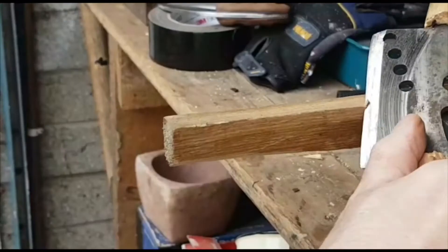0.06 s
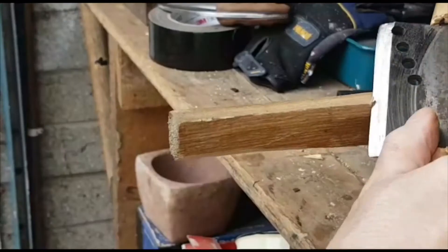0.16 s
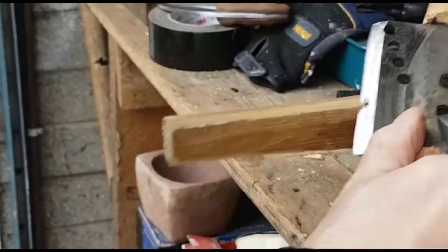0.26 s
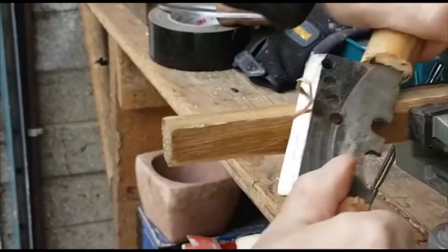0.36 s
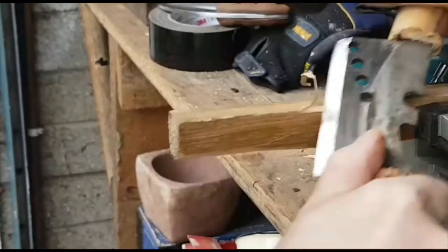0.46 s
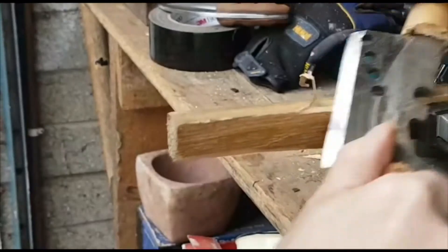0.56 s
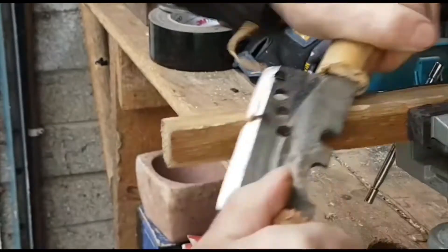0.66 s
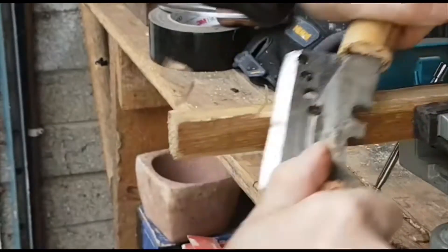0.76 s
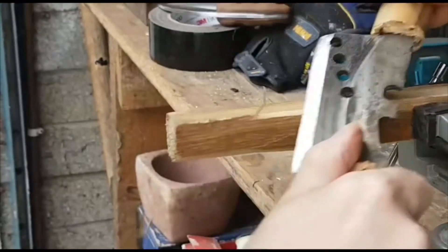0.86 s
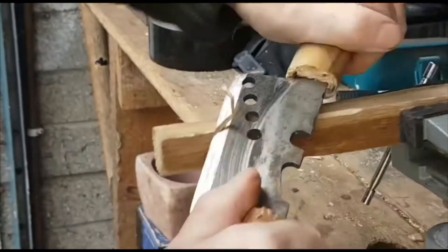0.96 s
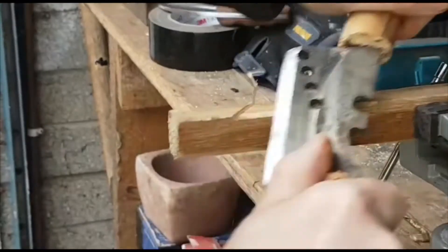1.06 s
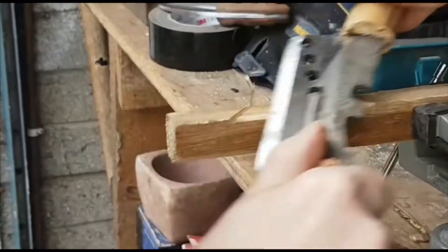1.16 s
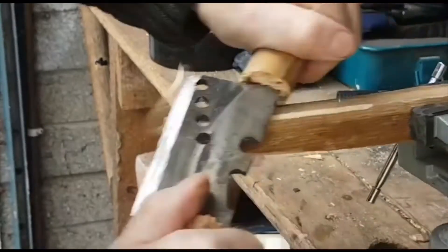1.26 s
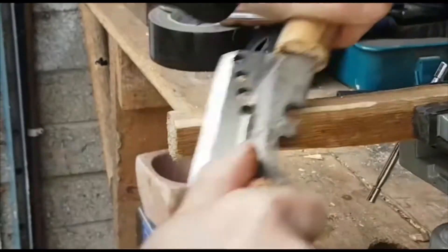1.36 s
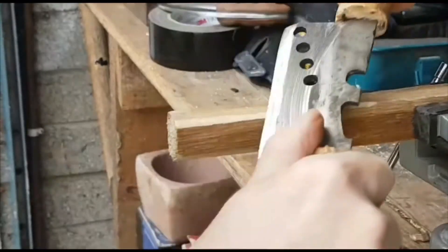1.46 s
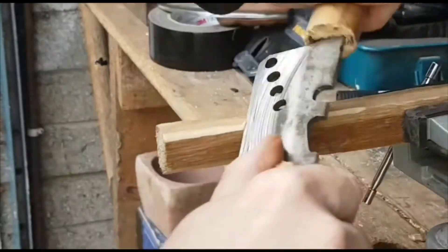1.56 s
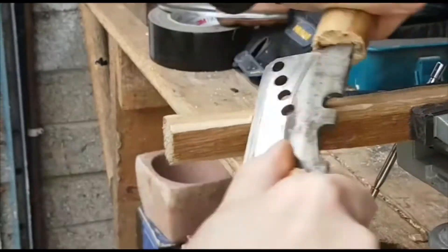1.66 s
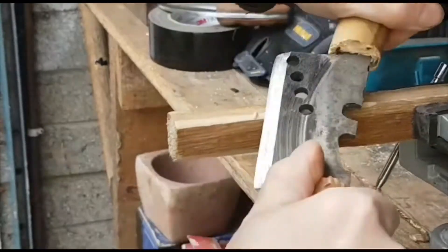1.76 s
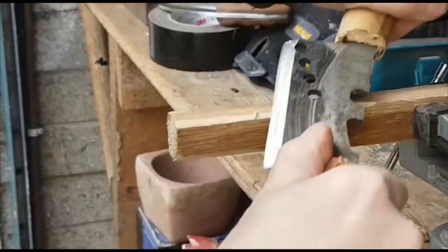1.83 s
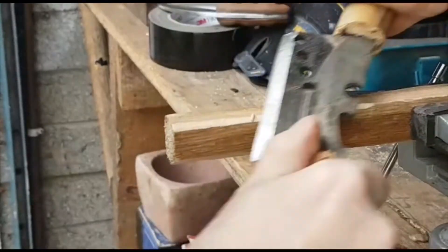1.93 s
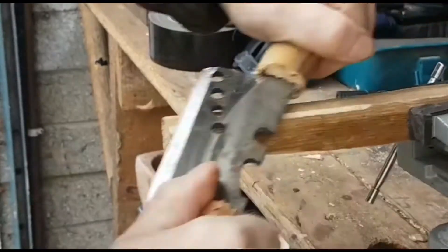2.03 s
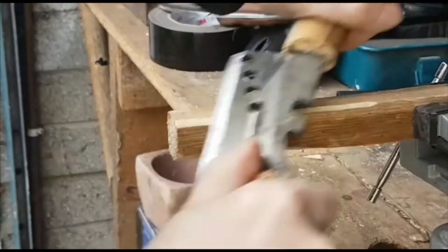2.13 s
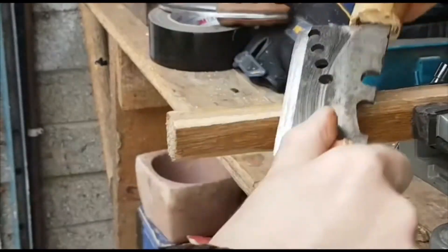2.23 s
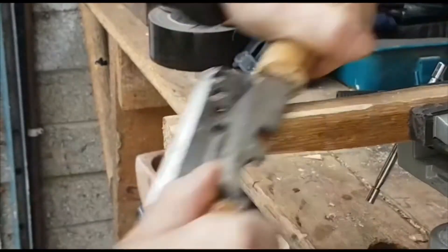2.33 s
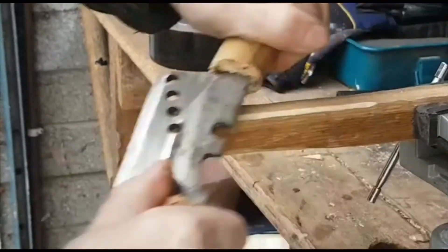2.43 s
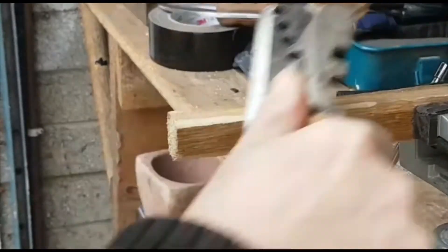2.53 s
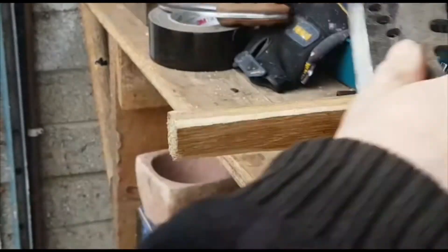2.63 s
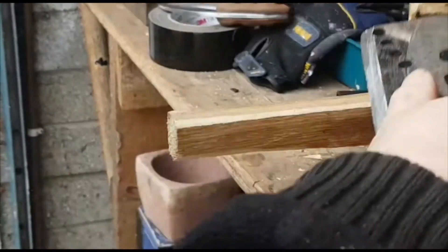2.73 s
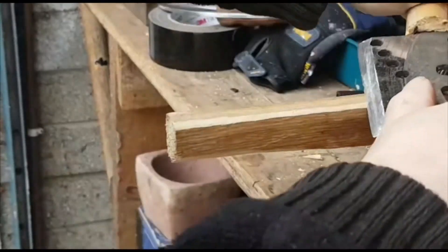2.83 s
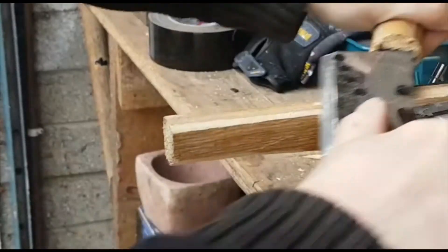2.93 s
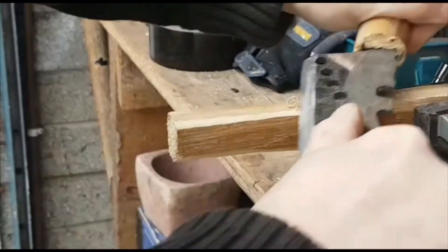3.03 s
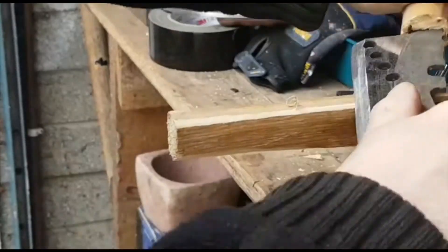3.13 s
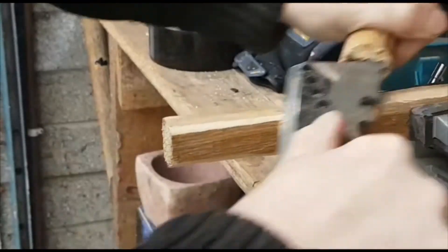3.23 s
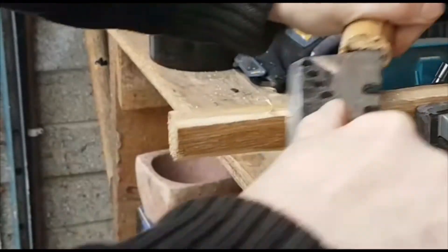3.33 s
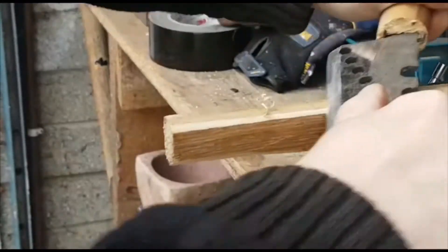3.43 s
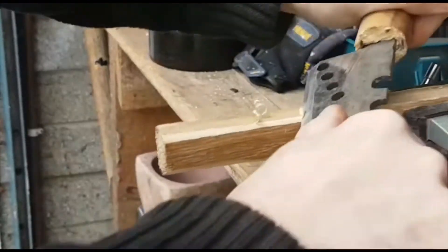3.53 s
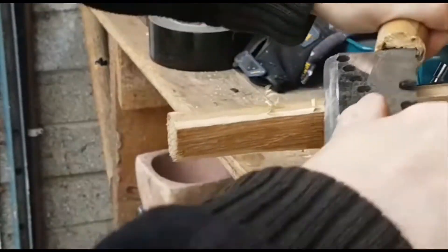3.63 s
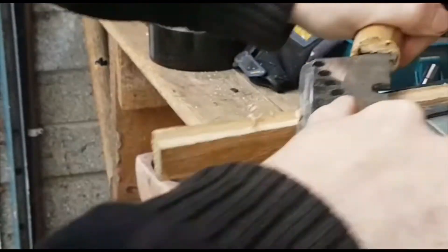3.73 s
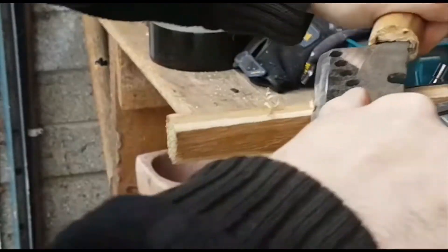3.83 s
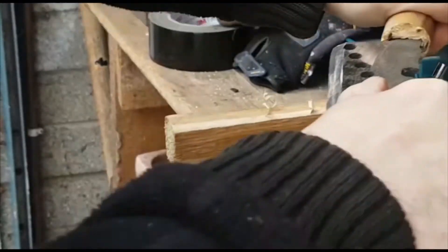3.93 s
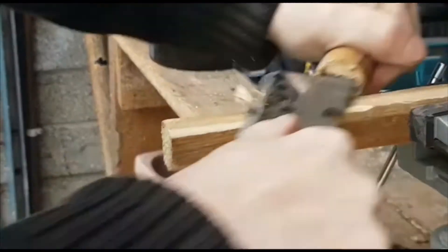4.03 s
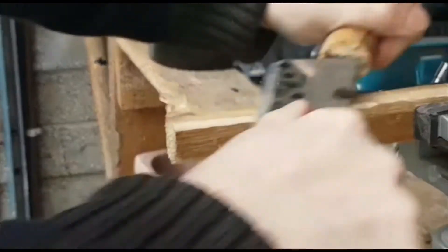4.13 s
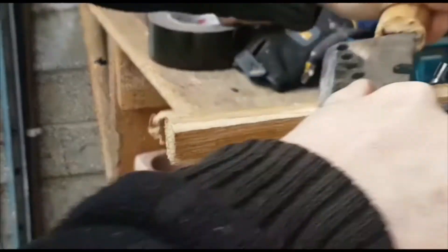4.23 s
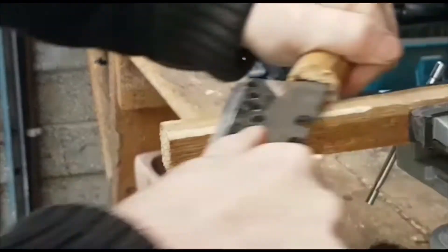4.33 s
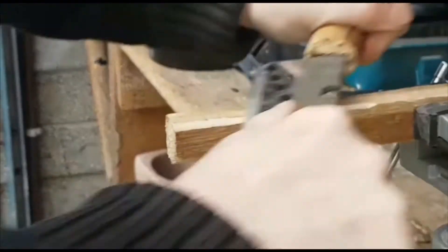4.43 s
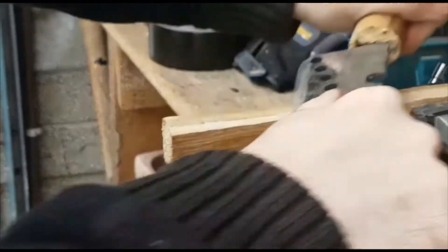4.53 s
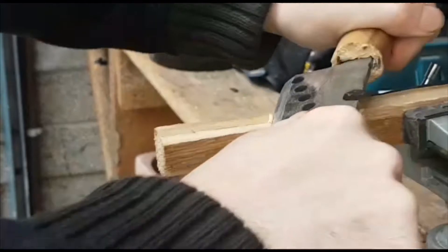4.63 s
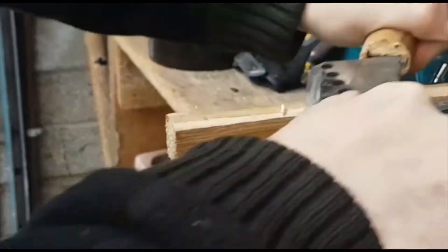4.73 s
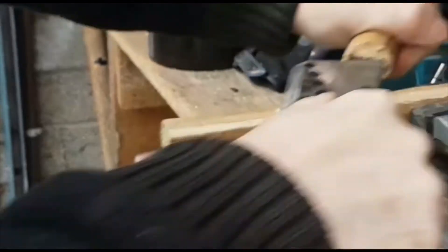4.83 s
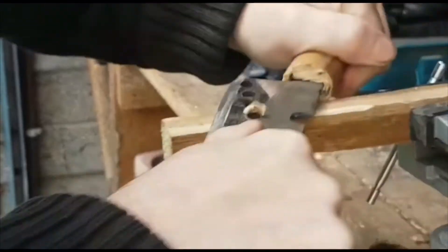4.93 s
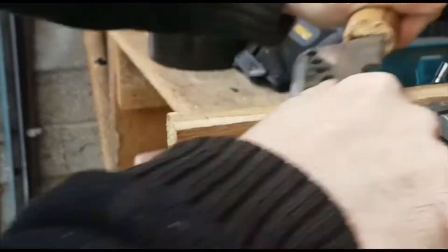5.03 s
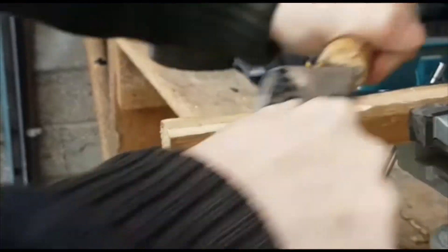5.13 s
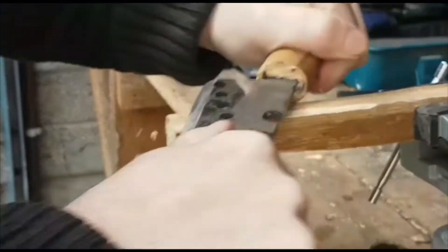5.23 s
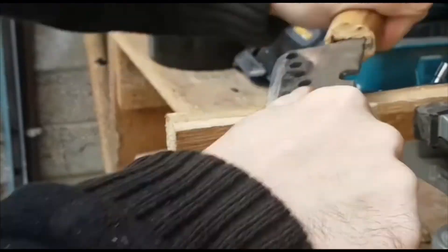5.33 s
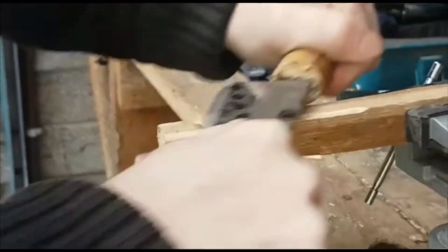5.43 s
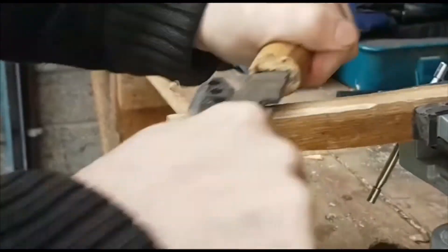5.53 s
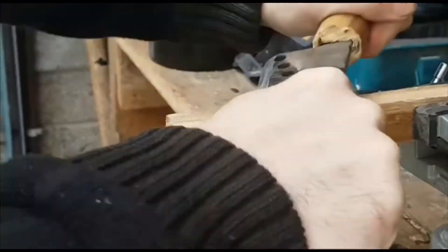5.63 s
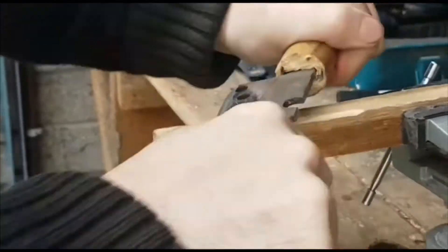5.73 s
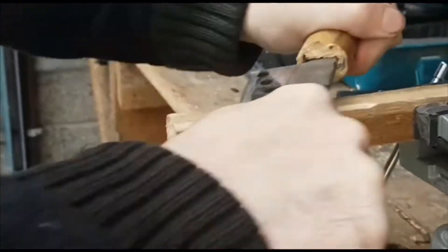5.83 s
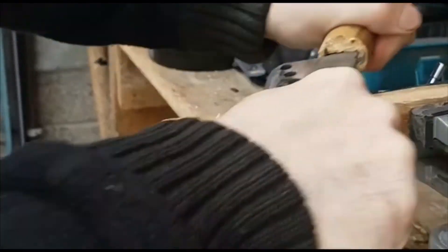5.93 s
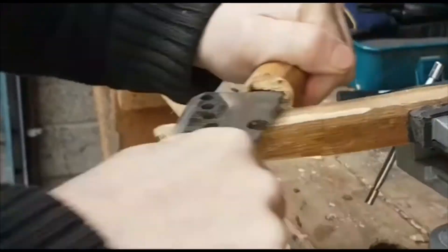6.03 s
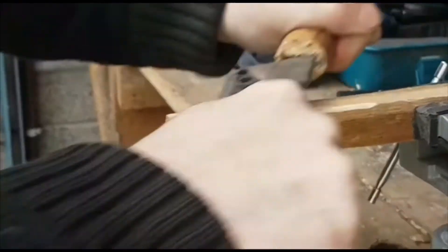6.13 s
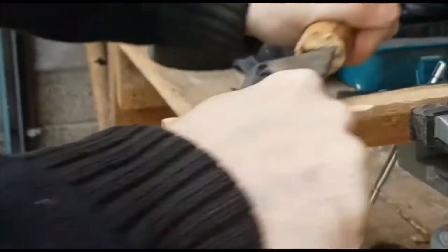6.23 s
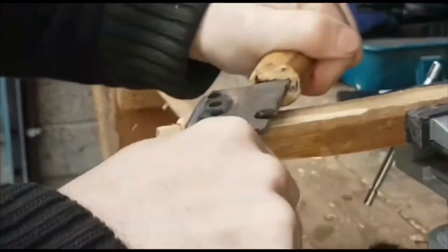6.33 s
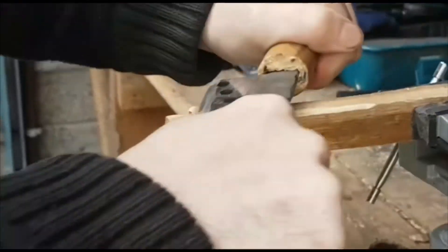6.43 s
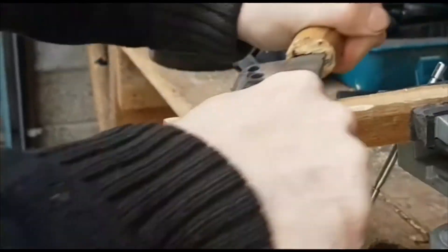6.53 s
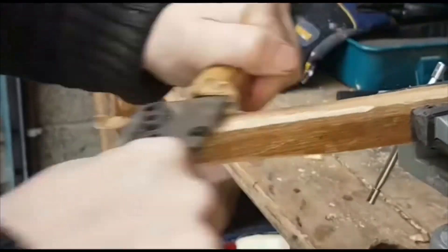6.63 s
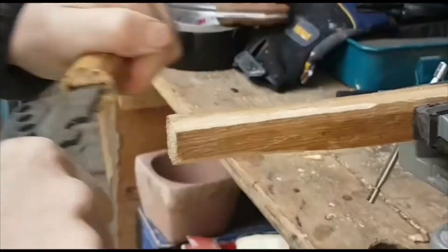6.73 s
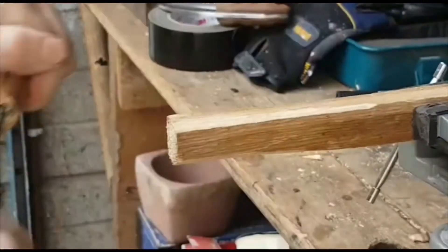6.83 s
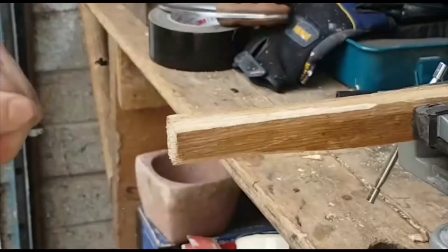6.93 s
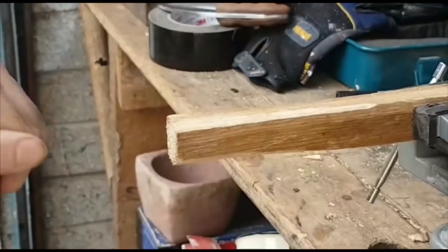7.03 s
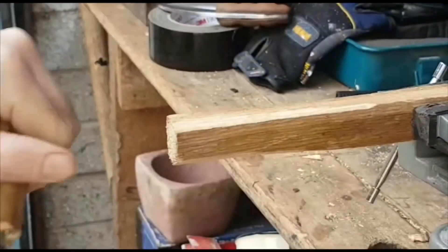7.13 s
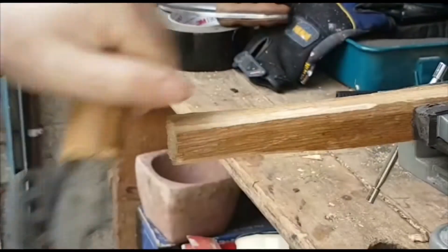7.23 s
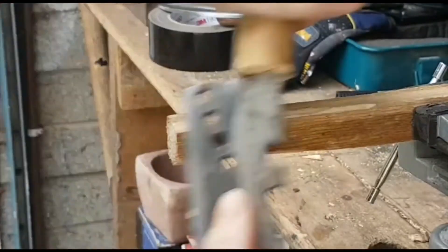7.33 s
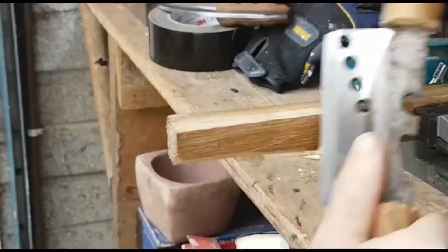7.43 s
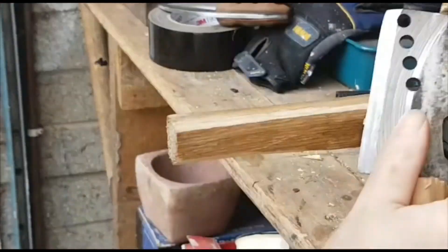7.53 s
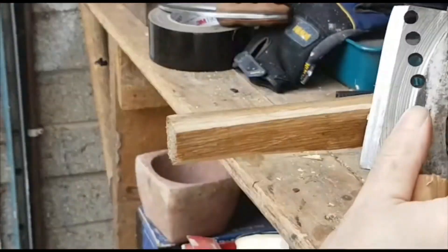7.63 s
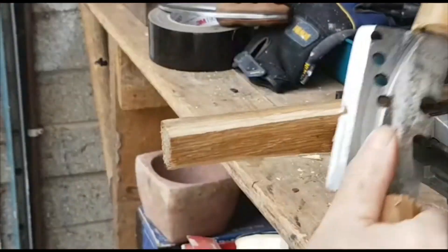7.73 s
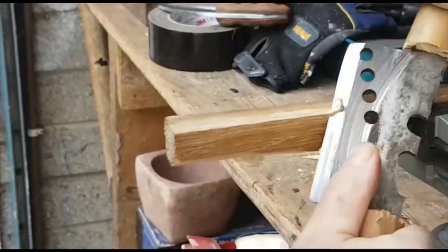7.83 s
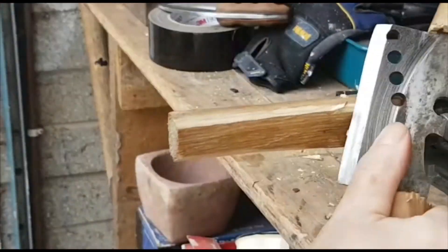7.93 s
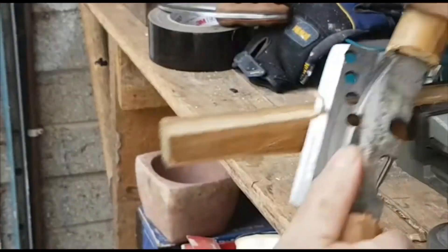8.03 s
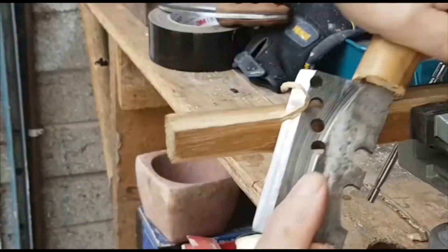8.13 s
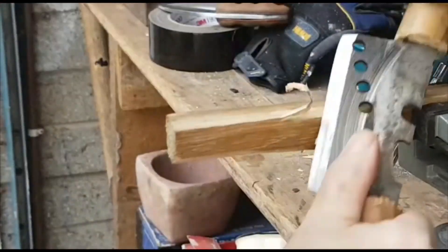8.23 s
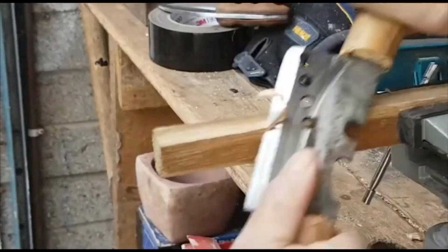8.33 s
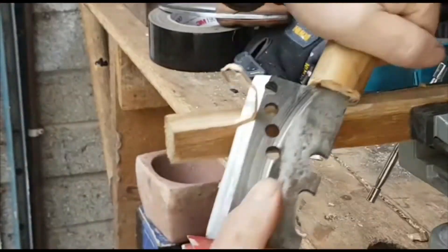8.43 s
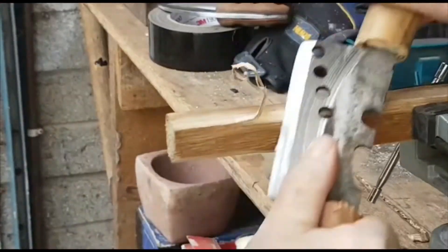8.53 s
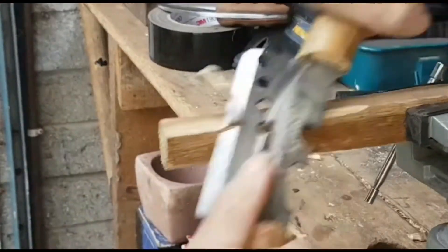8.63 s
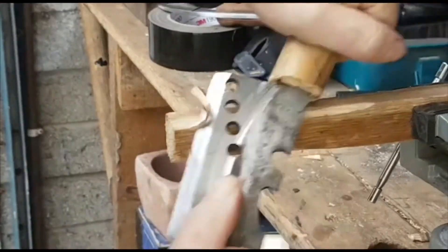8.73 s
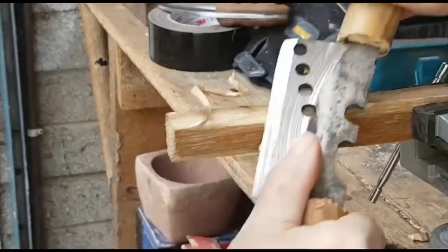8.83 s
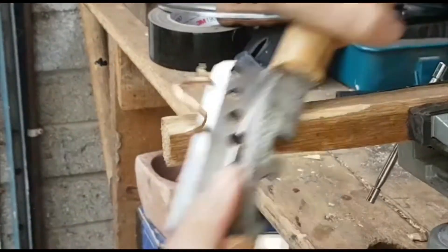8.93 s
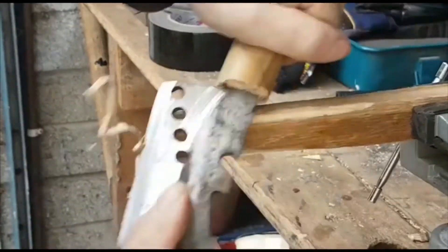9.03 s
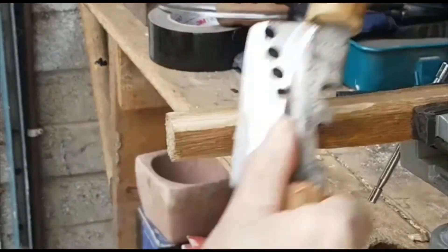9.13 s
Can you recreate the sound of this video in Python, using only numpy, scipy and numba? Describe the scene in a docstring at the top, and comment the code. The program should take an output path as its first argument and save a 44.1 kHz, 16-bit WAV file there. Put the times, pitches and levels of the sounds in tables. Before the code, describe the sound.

Quick, dry scrapes of a draw-knife cutting wood in a vise, close up, with splinters snapping and dull taps in a small workshop.

```python
"""Short, rasping cuts, close to the microphone: a steel draw-knife shaves a wooden stick held in a vise.
The edge sticks and slips, fibres tear and hiss, splinters crack, and deep cuts shake the stick.
Between cuts the blade skims the wood, taps down, chatters and once squeaks.
The place is a small, dry workshop, heard in stereo: quick reflections off the bench, faint room tone."""
import sys
import numpy as np
from scipy import signal
from scipy.fft import rfft, irfft
from scipy.io import wavfile
from numba import njit

SR = 44100
rng = np.random.default_rng(int(sys.argv[2]) if len(sys.argv) > 2 else 0)


def bounce(signal):
    """Save signal as a 16-bit WAV file at the path given by the first command-line argument."""
    frames = np.transpose(np.atleast_2d(signal))
    limited = np.clip(frames, -1, 1)
    pcm = np.round(limited * 32767).astype(np.int16)
    wavfile.write(sys.argv[1], SR, pcm)


N = 404397
TIME = np.arange(N) / SR
FFT_SIZE = 8192
FREQS = np.arange(FFT_SIZE // 2 + 1) * SR / FFT_SIZE

# the blade is pulled through the wood, then slid back; the return rub is very low where it lifts off:
# (start [s], cut length [s], force [dB], tearing [dB], return rub [dB])
KNIFE_STROKES = [(0.152, 0.076, -40, -48.5, -56), (0.477, 0.098, -39.5, -50.5, -59.5),
                 (0.787, 0.042, -46, -48, -53.5), (1.066, 0.073, -44, -44, -57),
                 (1.822, 0.1, -39.5, -56.5, -61), (2.142, 0.12, -48, -52.5, -110),
                 (2.766, 0.098, -50.5, -61, -54.5), (3.047, 0.1, -50, -57.5, -52),
                 (3.306, 0.09, -55, -80, -68.5), (3.582, 0.045, -42.5, -64, -52),
                 (3.831, 0.097, -42, -51.5, -48.5), (4.112, 0.14, -47, -55.5, -51.5),
                 (4.396, 0.088, -52, -58.5, -58.5), (4.7, 0.093, -43.5, -51, -53),
                 (4.968, 0.11, -48, -52, -52), (5.252, 0.099, -43, -50.5, -48.5),
                 (5.542, 0.099, -49.5, -58.5, -55.5), (5.845, 0.085, -42.5, -51, -53),
                 (6.101, .095, -42.5, -49, -59.5), (6.429, 0.12, -36.5, -43.5, -110),
                 (7.564, .11, -52.5, -77, -67), (7.885, 0.1, -42.5, -50, -59.5),
                 (8.196, 0.11, -41, -47.5, -58), (8.466, 0.12, -48, -51, -54.5),
                 (8.773, .11, -45, -48, -110), (9.148, 0.02, -42.5, -66, -110)]
# the edge catches and a splinter cracks off: (time [s], strength [dB], bright snap [dB])
SPLINTERS = [(0.136, -53, -60.5), (0.51, -19, -53), (0.867, -30.5, -70), (0.883, -30, -68),
             (1.069, -32, -47.5), (1.814, -29.5, -50), (1.849, -20.5, -76), (2.152, -31.5, -64),
             (3.582, -29, -55), (3.833, -29, -53.5), (4.109, -36.5, -80), (4.702, -26, -52),
             (4.969, -32.5, -78), (5.243, -33.5, -82), (5.846, -29, -53.5), (6.472, -30, -49),
             (7.938, -69, -52), (7.979, -33.5, -58), (8.204, -45, -48.5), (8.262, -32, -51),
             (8.847, -34.5, -59), (9.133, -40, -57.5), (9.147, -29.5, -71)]
# a deep cut lets go and the stick springs back hard: (time [s], strength [dB])
SPRING_BACKS = [(0.156, -35), (0.19, -33.5), (0.513, -36), (1.851, -36), (6.475, -33), (6.493, -31),
                (7.915, -37), (7.954, -37.5), (8.227, -34), (8.264, -33.5), (8.849, -30), (9.15, -40.5)]
# the blade slides flat without cutting: (middle [s], half length [s], rub [dB], hiss [dB], ring [Hz])
FLAT_SLIDES = [(.475, .045, -53, -57, 540), (.765, .032, -51.5, -54, 1070), (1.015, .05, -49, -57, 830),
               (1.428, .066, -56.5, -58, 530), (1.697, .11, -70, -69, 523), (1.975, .04, -54, -61, 514),
               (3.51, .04, -64, -63, 517)]
# the blade is set down or bumps on the wood: (time [s], level [dB], ring [Hz])
BLADE_TAPS = [(1.332, -40.5, 555), (2.087, -36.5, 576), (2.615, -36, 476), (3.661, -37.5, 1030),
              (3.685, -37.5, 1080), (5.998, -38.5, 850), (6.342, -37.5, 563), (7.39, -53, 584),
              (7.874, -43, 790)]
# the flat of the blade squeaks on the way back: (time [s], pitch [Hz], level [dB])
SQUEAK_PATH = [(1.351, 2240, -69), (1.399, 2094, -54.5), (1.455, 1928, -51), (1.495, 1880, -60),
               (1.51, 1870, -82)]
# resonances of stick, vise and blade: (frequency [Hz], width [Hz], lift [dB])
RESONANCES = [(126.4, 23.6, 10), (195.6, 32, 7.5), (277.1, 23.7, 11), (403.3, 32, 6.5), (698, 29, 3),
              (1130, 80, 0.5), (1424, 40, 5), (1826, 64, 7), (1996, 150, 3), (2310, 173, 7),
              (2774, 120, 3.5), (3013, 57, 5.5), (3328, 40, 9.5), (4760, 26, 7), (5190, 49, 7),
              (6700, 170, 5.5)]
# colours of the work, heard from close by: (frequency [Hz], level [dB])
SLIP_COLOUR = [(100, -22.5), (300, -8), (480, 3.5), (750, 0), (1100, -1), (1900, -7), (2600, -12.5),
               (3500, -19.5), (4500, -23), (15000, -56.5)]  # the edge slipping
TEAR_COLOUR = [(300, 2.5), (1200, 1), (2500, 8.5), (3400, 7.5), (4100, 0), (6000, -2), (8500, -3.5),
               (10000, -8.5), (13000, -4), (16000, -24)]  # fibres tearing
SHAKE_COLOUR = [(25, -49), (60, -7), (110, -1), (190, -3), (370, 2.5), (520, -16), (900, -15), (3000, -53)]  # the stick shaking
RUB_COLOUR = [(50, -14), (130, -8), (500, 6), (1500, -2), (2500, -4.5), (3400, -37), (4500, -30),
              (15000, -44)]  # light rubbing
HISS_COLOUR = [(1200, -1), (2400, 8), (2750, 9), (3150, 14), (3550, 11), (3950, 3.5), (6000, 0),
               (8500, -0.5), (9700, -5), (15000, -3)]  # the edge hissing
THUD_COLOUR = [(40, -24), (80, -17), (130, -12), (200, 0.5), (300, 2), (450, -1.5), (900, -14.5),
               (3000, -50.5)]  # the stick springing back
# how much the bench reflections differ between the microphones: (frequency [Hz], level [dB])
BENCH_WIDTH = [(140, -27), (270, -22), (500, -7), (1000, -9.5), (2000, -1), (4000, -2)]
# left microphone minus right: (frequency [Hz], level [dB])
MIC_BALANCE = [(120, -1), (400, 3), (2000, 0), (13000, 2.5)]
# the quiet workshop: (frequency [Hz], level [dB])
ROOM_TONE_COLOUR = [(15, -33), (25, -32), (59, -1), (173, -11.5), (389, -3.5), (2560, -21.5), (3530, -25),
                    (6550, -30.5), (8350, -33), (15500, -29)]

USUAL_FORCE_DB, USUAL_RUB_DB = -43.5, -52  # firmness is a return's rub in dB above the usual
BITE_S, EASE_SHARE = 0.029, 0.46  # rise of a cut: quick if it opens with a crack, else a share of it
SHAKE_DB, SHAKE_GROWTH = -45.5, 0.93  # shaking at the usual force, and dB per dB of force
RELEASE_DB, RELEASE_LEAD_S = -27.5, .04  # the unloaded stick knocks in the vise before mid-return
BACK_MIDDLE_SHARE, BACK_HALF_S = .49, 0.056  # a return's place in the gap between cuts; its half length
PAUSE_S, LIFT_OFF_S = .33, .14  # before a pause, the return is a short lift-off
BACK_HISS_DB, BACK_HISS_GROWTH = -60, 0.41  # hiss at the usual rub, and dB per dB of firmness
HOLLOW_HZ, FIRM_DB_PER_OCTAVE = 668, 17.5  # firmer rubbing rings higher
CHATTER_DB, CHATTER_GROWTH, CHATTER_HZ = -51, 1.44, 790  # growth in dB per dB of firmness
CHATTER_LAG_S, CHATTER_HALF_S = 0.017, 0.012  # the chatter comes just after mid-return
HANDS_SWING_RAD = 0.9  # how far the moving hands change the bench reflections
LEFT_LAG_SAMPLES = 1  # the work reaches the left microphone later
ROOM_TONE_DB, TOP_HZ = -65, 15850


def wood():
    """The main source, close up: cutting, cracking and rubbing all ring the same resonances."""
    body_db = sum(db / (1 + (2 * (FREQS - hz) / width) ** 2) for hz, width, db in RESONANCES)
    moving = stalls()
    rub, hiss, hollow_ring = moving * np.array(skims())
    slip, tear, shake = moving * np.array(strokes()) + cracks()
    layers = [(slip, SLIP_COLOUR), (tear, TEAR_COLOUR), (shake, SHAKE_COLOUR),
              (rub, RUB_COLOUR), (hiss, HISS_COLOUR), (thumps(), THUD_COLOUR)]
    return hollow_ring + sum(through(force, response(shape(colour) + body_db))
                             for force, colour in layers)


def strokes():
    """Forces of cutting: slips of the edge, fibres torn by each slip, and jerks that shake the stick."""
    slip_gain, tear_gain, shake_gain = np.zeros((3, N))
    for s, rise_s, fall_s, force_db, tear_db in cuts():
        start, pressure = swell(s, rise_s, fall_s, squareness=1.64)
        shake_db = SHAKE_DB + SHAKE_GROWTH * (force_db - USUAL_FORCE_DB)
        add(slip_gain, start, undb(force_db) * pressure)
        add(tear_gain, start, undb(tear_db) * pressure)
        add(shake_gain, start + 0.0045, undb(shake_db) * pressure)
    jerks = stick_slip(rate=240, jitter=.5, spread_db=5.5)
    # every jerk releases a short shower of breaking fibres
    jerk_tails = np.abs(through(np.maximum(jerks, 0), fade(0.012)))
    shower = unit(np.sqrt(1.7 + jerk_tails / 8))
    grain = undb(2.76 * walk(120))  # hard and soft layers of the wood
    fibres = shower * clicks(rate=4500, spread_db=3.5)
    slip = (undb(-12) * jerks + undb(-0.5) * fibres) * slip_gain * grain
    # the curling shaving rings at a pitch that wanders with its length
    shaving_hz = 1600 * np.exp(np.clip(0.252 * walk(22), -1, 1))
    slip = slip + undb(2.5) * bandpass(slip, shaving_hz, q=26.0)
    tear = shower * clicks(rate=9000, spread_db=-4) * undb(2.4 * walk(150))
    return slip, tear * tear_gain * grain, jerks * shake_gain


def cuts():
    """Each pull of the knife as (peak time [s], rise [s], fall [s], force [dB], tearing [dB])."""
    for start, length_s, force_db, tear_db, _ in KNIFE_STROKES:
        bites = any(abs(start - s) < 0.005 for s, *_ in SPLINTERS)
        rise_s = min(BITE_S if bites else EASE_SHARE * length_s, length_s * 4 / 5)
        yield start + rise_s, rise_s, length_s - rise_s, force_db, tear_db


def stick_slip(rate, jitter, spread_db):
    """The edge loads up and lets go, at uneven intervals and with uneven force."""
    turns = np.cumsum(rate * np.exp(jitter * walk(2 * rate))) / SR
    lets_go = np.diff(np.floor(turns), prepend=0) > 0
    slips = sizes(lets_go, spread_db)
    return unit(slips - slips.mean())


def cracks():
    """Forces of splinters (a sharp break, a crumbling, a thud) and of the unloaded stick's knocks."""
    slip, tear, shake = np.zeros((3, N))
    for s, db, snap_db in SPLINTERS:
        crumble, thud = burst(0.11), undb(db + 4.5)
        add(slip, s, undb([db + 11.5]))
        add(slip, s, undb(db + 15) * crumble)
        add(tear, s, undb([snap_db + 21]))
        add(tear, s, undb(snap_db + 34.5) * crumble)
        add(shake, s + 0.0018, [thud])
        add(shake, s + 0.0012, thud * burst(0.053))
    for s, _ in ways_back():
        add(shake, s - RELEASE_LEAD_S, undb([RELEASE_DB]))
    return slip, tear, shake


def stalls():
    """In the 20 ms before a splinter breaks, the edge sticks and the scraping dips."""
    held = np.zeros(N)
    for s, *_ in SPLINTERS:
        add(held, s - 0.02, np.linspace(0, 1, SR // 50))
    return undb(-2.5 * np.minimum(held, 1))


def thumps():
    """The blow of the stick springing back, and its brief rattle in the vise."""
    force = np.zeros(N)
    for s, db in SPRING_BACKS:
        add(force, s, undb([db + 19]))
        add(force, s, undb(db + 28.5) * burst(0.098))
    return force


def twang(hz=385):
    """Hard cracks set the free end of the stick swinging, far more than light ones."""
    out, decay = np.zeros(N), fade(0.08)
    ring = decay * np.sin(2 * np.pi * hz * TIME[:len(decay)])
    for s, db, _ in SPLINTERS:
        add(out, s + 0.00265, undb(2 * db + 15.5) * ring)
    return out


def skims():
    """Light rubbing: fine clicks, a hollow ring that sinks as the contact moves, and a thin edge hiss."""
    rub, hiss, ring = np.zeros((3, N))
    friction = clicks(rate=3900, spread_db=1) * undb(1.8 * walk(60))
    returns = [(s, BACK_HALF_S, USUAL_RUB_DB + firm_db, BACK_HISS_DB + BACK_HISS_GROWTH * firm_db,
                HOLLOW_HZ * 2 ** (firm_db / FIRM_DB_PER_OCTAVE)) for s, firm_db in ways_back()]
    for s, half_s, rub_db, hiss_db, ring_hz in returns + list(FLAT_SLIDES):
        start, pressure = swell(s, half_s, half_s, squareness=3.7)
        force = undb(rub_db) * pressure * friction[int(start * SR):][:len(pressure)]
        sinking_hz = ring_hz * np.geomspace(3.6, 1 / 3.93, len(force))
        add(rub, start, undb(-1.5) * force)
        add(ring, start, undb(19.5) * bandpass_twice(force, sinking_hz, q=6.8))
        add(hiss, start, undb(hiss_db) * pressure)
    # the edge hisses as it enters a cut too, equally however deep it goes
    for s, rise_s, fall_s, *_ in cuts():
        start, pressure = swell(s - .015, rise_s, fall_s, squareness=11.5)
        add(hiss, start, undb(-58.5) * pressure)
    return rub, hiss * clicks(rate=13000, spread_db=0), ring


def ways_back():
    """Each return of the blade as (middle [s], firmness [dB])."""
    for (start, length_s, _, _, rub_db), (next_start, *_) in zip(KNIFE_STROKES, KNIFE_STROKES[1:]):
        gap_s = next_start - start - length_s
        if gap_s > PAUSE_S:
            gap_s = LIFT_OFF_S
        yield start + length_s + BACK_MIDDLE_SHARE * gap_s, rub_db - USUAL_RUB_DB


def taps():
    """The hand-damped blade lands with a dull, rattling knock; one mode depends on where it touches."""
    out, t = np.zeros(N), TIME[:FFT_SIZE // 2]
    knock = undb(15.5) * response(shape(RUB_COLOUR))
    for s, db, ring_hz in BLADE_TAPS:
        # (frequency [Hz], level [dB], t60 [s])
        modes = [(ring_hz, -1, .048), (950, -2, .012), (2350, -6, .012)]
        ring = sum(undb(mode_db) * fade(t60, len(t)) * np.sin(2 * np.pi * hz * t)
                   for hz, mode_db, t60 in modes)
        force = undb(5) * burst(0.11)
        force[0] += undb(-3.5)  # first contact
        add(out, s + 0.00086, undb(db - 6) * signal.fftconvolve(force, ring + knock))
    return out


def chatters():
    """Quick runs of slips ring the blade on its way back; the pitch falls as the contact point slides."""
    out, slips = np.zeros(N), stick_slip(rate=330, jitter=0.55, spread_db=6.5)
    rise_s, fall_s = 1.1 * CHATTER_HALF_S, 1.25 * CHATTER_HALF_S
    for s, firm_db in ways_back():
        start, pressure = swell(s + CHATTER_LAG_S, rise_s, fall_s, squareness=2.6)
        glide = np.geomspace(1.5, 1 / 1.34, len(pressure))
        hz = CHATTER_HZ * 2 ** (firm_db / FIRM_DB_PER_OCTAVE) * glide
        ring = bandpass_twice(slips[int(start * SR):][:len(pressure)], hz, q=3.8)
        add(out, start, undb(CHATTER_DB + CHATTER_GROWTH * firm_db) * unit(ring) * pressure)
    return out


def squeak():
    """A rough, falling friction tone that stutters as the blade grips and lets go."""
    s, hz, db = np.transpose(SQUEAK_PATH)
    rough_hz = np.interp(TIME, s, hz) * (1 + .06 * walk(900))
    phase = 2 * np.pi * np.cumsum(rough_hz) / SR
    stutter = undb(2.5 * walk(380))
    return unit(np.sin(phase) * stutter) * np.interp(TIME, s, undb(db), left=0, right=0)


def bench_reflections(work):
    """Quick reflections off the nearby bench shift as the hands move and widen the stereo image."""
    hands = HANDS_SWING_RAD * walk(8.9)
    reflections = sum(weight * reflect(work, t60=.11, delay_samples=SR // 600)
                      for weight in (np.cos(hands), np.sin(hands)))
    return tint(reflections, shape(BENCH_WIDTH))


def room_ring(work):
    """Farther off, the small workshop gives back a short, dull ring to each microphone."""
    dull = tint(work, shape([(120, -30), (450, 6), (2500, -1.5), (12000, -9)]))
    return undb(-11.5) * reflect(dull, t60=0.47, delay_samples=SR // 200)


def room_tone():
    """Steady background, shared by both microphones only in the bass."""
    mid, side = (tint(rng.standard_normal(N), shape(ROOM_TONE_COLOUR)) for _ in range(2))
    side = tint(side, shape([(60, -11.5), (280, -8.5), (1200, 0.5)]))
    return undb(ROOM_TONE_DB) / mid.std() * np.array([mid + side, mid - side])


def undb(db):
    """Decibels to gain."""
    return 10 ** (np.asarray(db) / 20)


def unit(x):
    """Scale to rms 1."""
    return x / np.sqrt(np.mean(x ** 2))


def shape(points):
    """Decibels at every frequency, from a few (frequency [Hz], level [dB]) points."""
    hz, db = np.transpose(points)
    return np.interp(np.log(FREQS + 1), np.log(hz), db)


def response(db):
    """Minimum-phase impulse response of unit energy with this colour."""
    half = FFT_SIZE // 2
    cepstrum = irfft(np.log(undb(db)))
    cepstrum[1:half] *= 2
    cepstrum[half + 1:] = 0
    impulse = irfft(np.exp(rfft(cepstrum)))[:half]
    return impulse / np.linalg.norm(impulse)


def tint(x, db):
    """Colour a sound without delaying it."""
    half = FFT_SIZE // 2
    return signal.oaconvolve(x, np.roll(irfft(undb(db)), half))[half:][:N]


def through(x, impulse):
    """Play a sound through an impulse response."""
    return signal.oaconvolve(x, impulse)[:N]


def reflect(x, t60, delay_samples):
    """A delayed, diffuse tail of a sound."""
    return through(x, np.pad(burst(t60), (delay_samples, 0)))


def fade(t60, size=16384):
    """A decay that loses 60 dB in t60 seconds."""
    return np.exp(-np.log(1000) * TIME[:size] / t60)


def burst(t60):
    """Dying noise of unit energy."""
    decay = fade(t60)
    noise = decay * rng.standard_normal(len(decay))
    return noise / np.linalg.norm(noise)


def swell(s, rise_s, fall_s, squareness):
    """Pressure of one movement, 1 at time s; returns its start time and its shape."""
    start = max(s - 4 * rise_s, 0)
    t = TIME[int(start * SR):int((s + 4 * fall_s) * SR)] - s
    return start, np.exp(-np.abs(t / np.where(t < 0, rise_s, fall_s)) ** squareness)


def add(track, s, sound):
    """Mix a sound into a track at time s."""
    i = int(s * SR)
    track[i:i + len(sound)] += sound[:N - i]


def walk(rate):
    """A random drift of rms 1 that turns about rate times a second."""
    count = int(rate * N / SR) + 2
    points = rng.standard_normal(2 ** 14)[:count]
    return unit(np.interp(TIME * rate, np.arange(count), points))


def clicks(rate, spread_db):
    """Randomly timed clicks of either sign, about rate a second."""
    chance = rng.uniform(-1, 1, N)
    return unit(np.sign(chance) * sizes(np.abs(chance) < rate / SR, spread_db))


def sizes(where, spread_db):
    """A click of random size at each marked sample."""
    out = np.zeros(N)
    out[where] = undb(spread_db * np.sqrt(12) * (rng.random(N)[where] - .5))
    return out


@njit
def bandpass(x, hz, q):
    """A resonance whose centre may move; gain 1 at the centre."""
    y, band, low = np.empty(len(x)), 0., 0.
    for i in range(len(x)):
        g = np.tan(np.pi * hz[i] / SR)
        v = (band + g * (x[i] - low)) / (1 + g * (g + 1 / q))
        band, low, y[i] = 2 * v - band, low + 2 * g * v, v / q
    return y


def bandpass_twice(x, hz, q):
    """The same resonance with steeper skirts."""
    return bandpass(bandpass(x, hz, q), hz, q)


def scene():
    """Two microphones close to the vise hear the work, then the bench, the room and its quiet tone."""
    work = wood() + twang() + taps() + chatters() + squeak()
    bench = bench_reflections(work)
    balance_db = shape(MIC_BALANCE) / 2
    left = tint(work + bench + room_ring(work), balance_db)
    right = tint(work - bench + room_ring(work), -balance_db)
    return np.array([np.roll(left, LEFT_LAG_SAMPLES), right]) + room_tone()


def record(dry):
    """The recorder cuts the top treble steeply."""
    return signal.sosfilt(signal.ellip(10, .1, 70, TOP_HZ, fs=SR, output="sos"), dry)


dry = scene()
out = record(dry)
bounce(out)
```